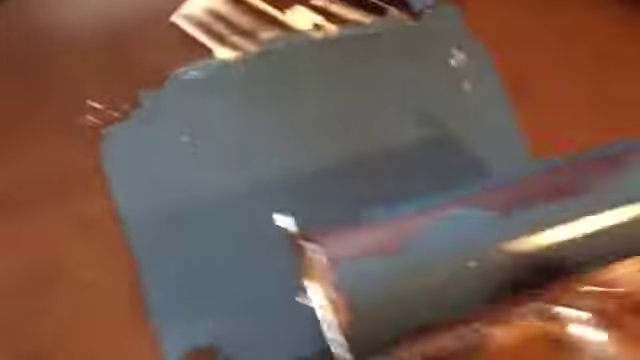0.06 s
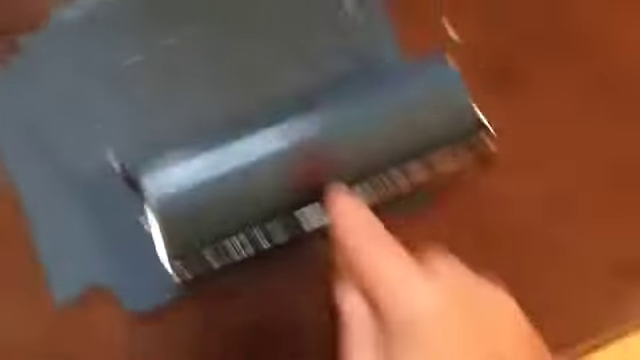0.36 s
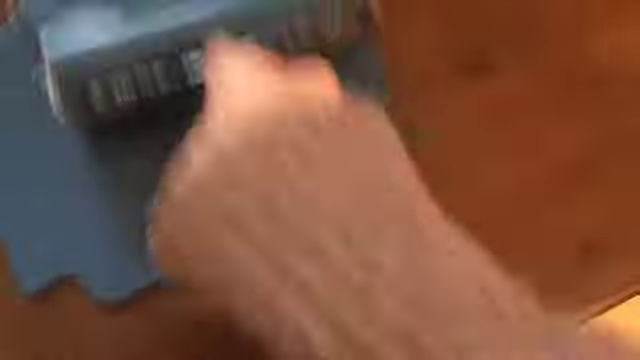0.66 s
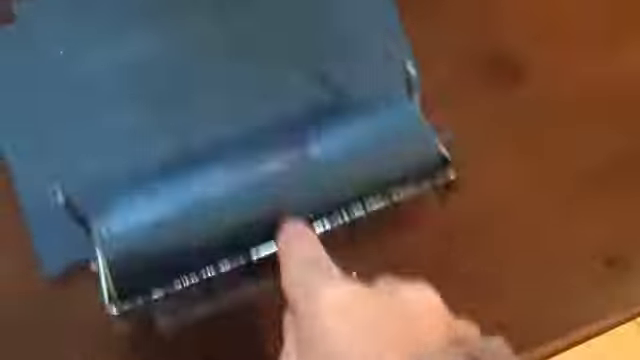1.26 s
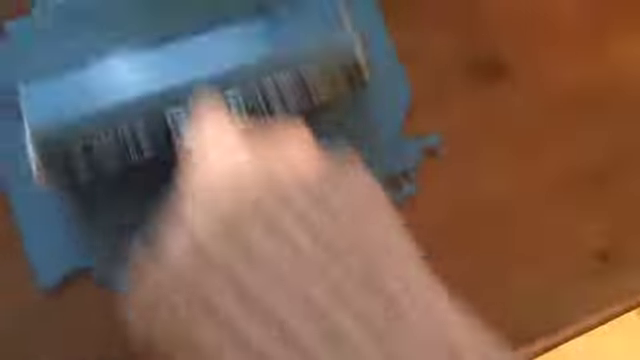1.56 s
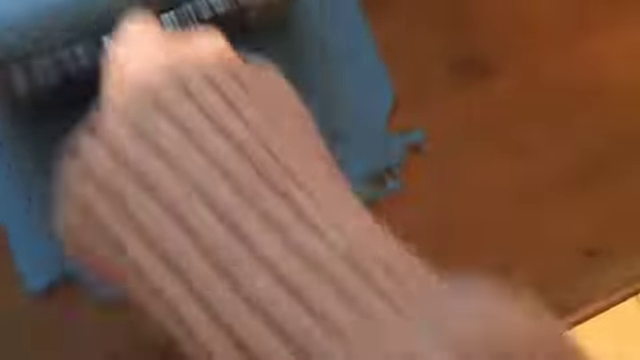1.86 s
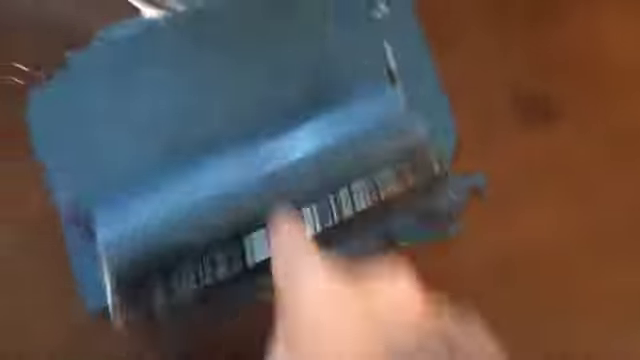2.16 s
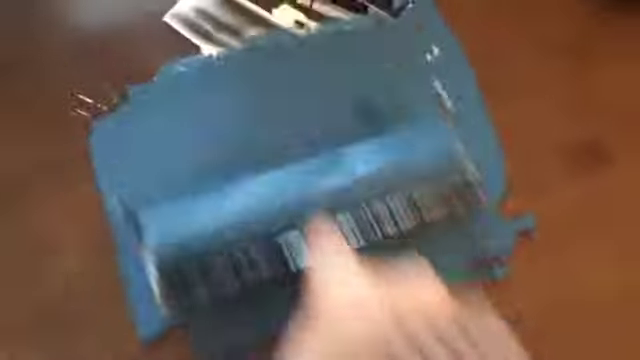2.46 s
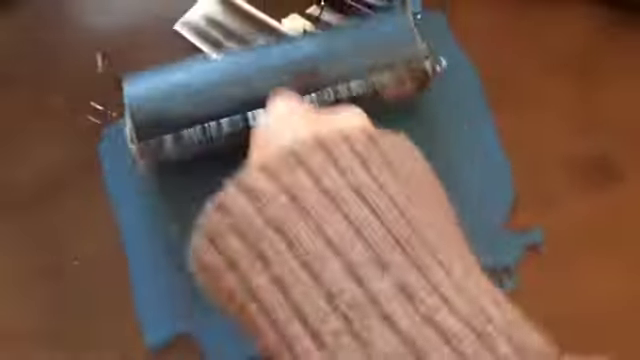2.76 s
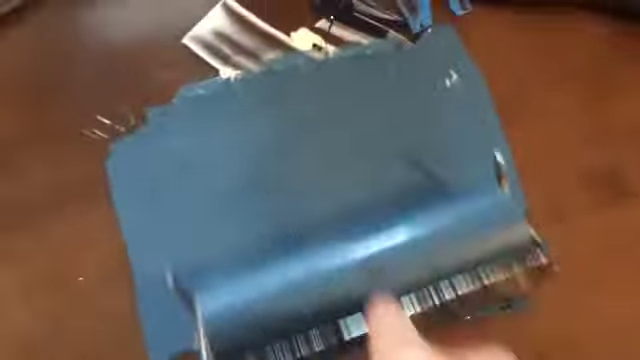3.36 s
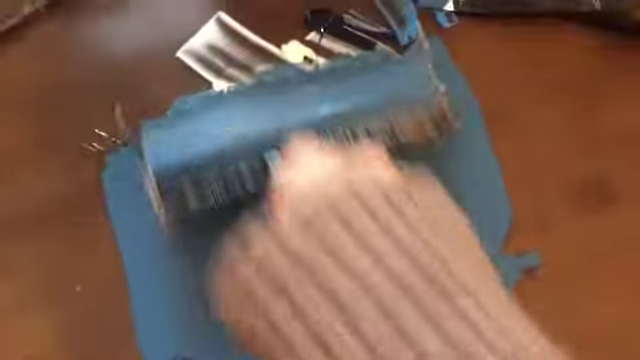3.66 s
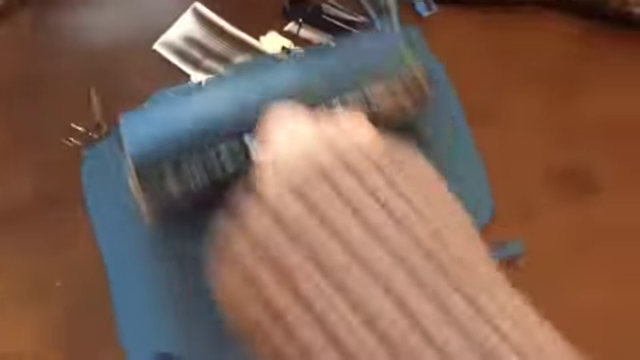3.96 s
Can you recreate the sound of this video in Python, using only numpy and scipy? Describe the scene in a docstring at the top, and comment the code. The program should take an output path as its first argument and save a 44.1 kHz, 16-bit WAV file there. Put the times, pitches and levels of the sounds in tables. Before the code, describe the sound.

A roller knocks onto a wooden table, then makes quick, sticky, hissing strokes through wet paint.

```python
"""A small room, a mono microphone close to a wooden table. A hand roller is set down with a knock,
creeps into a patch of tacky paint and is then rolled back and forth. The paint film splits behind
the roller in countless tiny snaps, a bright hiss that follows the speed and swells where the paint
is thickest. Underneath, the table rumbles and the roller's frame rings faintly."""
import sys
import numpy as np
from scipy import signal
from scipy.fft import rfft, irfft
from scipy.io import wavfile

SR = 44100
rng = np.random.default_rng(int(sys.argv[2]) if len(sys.argv) > 2 else 0)


def output_pcm(signal):
    """Save a mono or channel-first signal as 16-bit PCM at the path in sys.argv[1].

    Samples are clipped to [-1, 1] before scaling.
    """
    pcm = np.clip(np.atleast_2d(signal).T, -1, 1) * 32767
    wavfile.write(sys.argv[1], SR, np.round(pcm).astype(np.int16))


N = 176400
T = np.arange(N) / SR
BIN_HZ = np.arange(N // 2 + 1) * SR / N


def from_db(db):
    """Decibels to gain."""
    return 10 ** (np.asarray(db) / 20)


def unit_rms(x):
    """Scale to rms 1."""
    return x / np.sqrt(np.mean(x ** 2) + 1e-20)


def at_hz(points, hz):
    """Read a table on a log-frequency axis."""
    f, value = np.transpose(points)
    return np.interp(np.log(np.maximum(hz, 1)), np.log(f), value)


def coloured(x, spectrum):
    """Give a signal a spectrum; rms 1."""
    return unit_rms(irfft(rfft(x) * from_db(at_hz(spectrum, BIN_HZ)), N))


def drift(rate_hz):
    """Random wander, mostly slower than rate_hz; rms 1."""
    hop, settle = 20, 2000
    r = np.exp(-2 * np.pi * rate_hz * hop / SR)
    slow = signal.lfilter([1], [1, -2 * r, r * r], rng.standard_normal(N // hop + settle + 2))[settle:]
    return np.interp(np.arange(N) / hop, np.arange(len(slow)), unit_rms(slow))


def resonant_noise(hz, width_hz):
    """Random jolts through one resonance; rms 1."""
    r = np.exp(-np.pi * width_hz / SR)
    feedback = [1, -2 * r * np.cos(2 * np.pi * hz / SR), r * r]
    return unit_rms(signal.lfilter([1, 0, -1], feedback, rng.standard_normal(N)))


def decay(start, t60):
    """Envelope that jumps to 1 and falls 60 dB in t60 seconds."""
    return (T >= start) * from_db(-60 * np.clip((T - start) / t60, 0, 10))


def swell(centre, width_s):
    """Bell-shaped envelope."""
    return np.exp(-.5 * np.minimum(((T - centre) / width_s) ** 2, 100))


def struck(start, modes):
    """Modes set ringing by one blow."""
    t = np.clip(T - start, 0, 1)
    return sum(from_db(db) * decay(start, t60) * np.sin(2 * np.pi * hz * t) for hz, db, t60 in modes)


def room_tone(level_db=-69.5):
    """Quiet, steady background noise, strongest in the bass."""
    # Each row: frequency in Hz, relative noise density in dB.
    spectrum = [(25, -50), (40, 5), (58, 11.5), (85, -6.5), (170, -3), (400, -18.5), (800, -21.5),
                (2000, -22), (6000, -28.5), (15000, -35)]
    return from_db(level_db) * coloured(rng.standard_normal(N), spectrum)


def reflections(x, delay_s=0.00408):
    """The small room answers with a diffuse tail that dies sooner in the treble."""
    # Each row: frequency in Hz, reverberation time in seconds.
    room_t60 = [(150, 0.79), (800, 0.52), (3000, 0.33), (8000, 0.34), (15000, 0.33)]
    edges, tail = np.geomspace(60, 18000, 10), 0
    for low, high in zip(edges, edges[1:]):
        bandpass = signal.butter(2, [low, high], "band", fs=SR, output="sos")
        band = signal.sosfilt(bandpass, rng.standard_normal(SR))
        tail += band * decay(delay_s, at_hz(room_t60, np.sqrt(low * high)))[:SR]
    return signal.fftconvolve(x, tail / np.sqrt(np.sum(tail ** 2)))[:N]


def roller_motion(brake_s=0.083, speed_power=2.41):
    """Strokes speed up, cross thick paint and brake; gives velocity (pull positive) and peel strength."""
    # Pulls and pushes in turn. Each row: start, length and time to reach speed in seconds, level in dB,
    # time to the thick paint in seconds, its extra hiss in dB.
    strokes = [(0.685, 0.225, 0.053, -40.6, 0.063, 6.7), (0.89, 0.236, 0.102, -36.6, 0.169, 4.5),
               (1.125, 0.201, 0.045, -37.7, 0.056, 4.5), (1.305, 0.235, 0.105, -35.7, 0.162, 3.0),
               (1.547, 0.209, 0.055, -37.1, 0.07, 4.2), (1.733, 0.244, 0.099, -36.2, 0.158, 3.0),
               (1.968, 0.22, 0.074, -36.9, 0.077, 3.5), (2.167, 0.229, 0.07, -36.2, 0.14, 3.1),
               (2.403, 0.219, 0.056, -37.6, 0.074, 3.8), (2.592, 0.226, 0.055, -36.7, 0.136, 3.7),
               (2.821, 0.218, 0.064, -37.2, 0.078, 4.2), (3.02, 0.232, 0.072, -36.5, 0.142, 3.5),
               (3.263, 0.212, 0.055, -37.2, 0.071, 4.8), (3.451, 0.222, 0.064, -36.4, 0.139, 2.5),
               (3.678, 0.219, 0.088, -36.5, 0.075, 4.5), (3.864, 0.21, 0.075, -38.2, 0.145, 4.5)]
    velocity, peel = 0, 0
    for k, (start, length, rise, db, to_thick, thick_db) in enumerate(strokes):
        speeding_up = np.sin(np.pi / 2 * np.clip((T - start) / rise, 0, 1))
        braking = np.sin(np.pi / 2 * np.clip((start + length - T) / brake_s, 0, 1))
        speed = speeding_up * braking
        velocity += speed * (-1) ** k
        peel += speed ** speed_power * from_db(db + thick_db * swell(start + to_thick, width_s=0.021))
    return velocity, peel


def table_rumble(speed, level_db=-59.5, fade_db_per_s=-1, speed_power=2.47, rattle_db=-8.5):
    """Rolling shakes table and frame, less as the paint evens out; ridges add soft, low bumps."""
    # Table and frame. Each row: resonance in Hz, width in Hz, relative level in dB.
    resonances = [(113.4, 27, -7), (173, 36.5, -2), (205.6, 49, -5), (340, 42, -11), (627, 26, -17.5),
                  (783, 39, -5.5), (837, 36, -9.5), (859, 21, -18.5), (1410, 72, -16), (2223, 50, -13.5)]
    # Ridges in the paint. Each row: time in seconds, level in dB, pitch in Hz.
    ridges = [(0.563, -57, 200), (.705, -56, 203), (0.776, -51, 165), (1.029, -49, 169),
              (1.212, -51.5, 176), (1.26, -58, 200), (1.441, -50, 178), (1.503, -51.5, 205),
              (1.64, -47, 185), (1.875, -54, 189), (2.081, -63, 175), (2.295, -55, 175), (2.51, -59, 180),
              (2.939, -55, 186), (3.368, -54, 190), (3.568, -51.5, 191), (3.787, -54.5, 185),
              (3.98, -64, 190)]
    shaking = unit_rms(sum(from_db(db) * resonant_noise(hz, width) for hz, width, db in resonances))
    waver_hz = 11.66 * drift(38.9)
    waver_cycles = np.cumsum(waver_hz) / SR
    out = from_db(level_db + fade_db_per_s * (T - T.mean())) * speed ** speed_power * shaking
    for time, db, hz in ridges:
        tone = np.sqrt(2) * np.sin(2 * np.pi * (hz * (T - time) + waver_cycles))
        out += from_db(db) * swell(time, width_s=0.0086) * (tone + from_db(rattle_db) * shaking)
    return out


def landing_knock(thud_hz=110, thud_t60_s=.05, crack_db=-2):
    """The roller lands one end first and chatters: a thud, ringing wood and a clack of the frame."""
    # Each row: contact time in seconds, then levels of thud, wood and frame in dB.
    landings = [(.2939, -32.5, -50, -37.5), (.3413, -43, -20, -20), (0.3448, -40, -35.5, -34.5),
                (0.348, -42, -35.5, -41), (0.3523, -50, -29, -36)]
    # Table top and metal frame. Each row: mode in Hz, relative level in dB, t60 in seconds.
    wood_modes = [(88, -34, 0.34), (169.5, -19, 0.09), (226.6, -6.5, 0.14), (323, -7, 0.059),
                  (586, -20.5, 0.069), (785, -5, 0.053), (910, -14.5, 0.031), (990, -18.5, 0.016),
                  (1380, -21, 0.022), (1680, -25.5, .015)]
    frame_modes = [(1450, -8, .014), (1717, -7, .016), (1995, -8, .025), (2230, -15, .018),
                   (2440, -13, .02), (3130, -19, .035), (3700, -17, .022), (4400, -15, .012),
                   (5280, -15, .016), (6050, -12, .018), (7400, -17, .006), (9550, -13, .02),
                   (12100, -27, .018), (14800, -28, .018)]
    # Contact noise. Each row: frequency in Hz, relative density in dB.
    crack_spectrum = [(300, 7), (550, -1.5), (1000, 8.5), (1800, 0), (2400, 7), (2900, -8), (4000, -1),
                      (6000, 4), (7300, -10.5), (9600, 1), (11000, -25), (15000, -23)]
    crack = from_db(crack_db) * coloured(rng.standard_normal(N), crack_spectrum)
    out = 0
    for start, thud_db, wood_db, frame_db in landings:
        thud = struck(start, [(thud_hz, thud_db, thud_t60_s)])
        clack = struck(start, frame_modes) + crack * decay(start, t60=0.022)
        out += thud + from_db(wood_db) * struck(start, wood_modes) + from_db(frame_db) * clack
    return out


def snaps(per_s, spread_db=2):
    """Paint splits in tiny snaps of uneven size, at random moments; rms 1."""
    # Each row: frequency in Hz, relative density in dB.
    spectrum = [(300, -46.5), (1100, -21), (1800, -22), (2400, -16), (3300, -11), (4500, -8), (6400, -3.5),
                (7500, -5), (9600, -0.5), (10400, -4), (11200, 0), (15000, -0.5)]
    sizes = from_db(spread_db * np.minimum(rng.exponential(1, N), 4)) * rng.choice([-1, 1], N)
    snapping = rng.random(N) < per_s / SR
    return coloured(sizes * snapping / np.sqrt(per_s), spectrum)


def shifting_colour(hiss, velocity, wander_db=2.1, wander_hz=14):
    """The hiss changes colour at random, with the direction of travel and as the paint spreads; rms 1."""
    # Each row: frequency in Hz, dB added on a pull and taken away on a push.
    pull_colour = [(1000, 1.3), (2200, 0), (4000, 0.06), (8000, -0.45), (14000, 0)]
    # The hiss thins as the paint spreads. Each row: frequency in Hz, change in dB per second.
    thinning = [(1000, -0.5), (2200, -0.5), (4500, -.5), (8000, -0.03), (14000, 0)]
    centres = np.linspace(np.sqrt(900), np.sqrt(15000), 24) ** 2
    spectrum, out = rfft(hiss), 0
    for centre, share in zip(centres, np.eye(len(centres))):
        band = irfft(spectrum * np.interp(BIN_HZ, centres, share), N)
        colour_db = at_hz(pull_colour, centre) * velocity + at_hz(thinning, centre) * (T - T.mean())
        out += band * from_db(wander_db * drift(wander_hz) + colour_db)
    return unit_rms(out)


def tacky_paint(velocity, peel, snaps_per_s=16000, hiss_db=0.91, creep_db=-36,
                flicker_db=0.81, flicker_hz=45):
    """Snaps crowd into a hiss as the roller speeds up; the slow first roll crackles, and strings pop."""
    # The slow first roll. Each row: time in seconds, level in dB relative to creep_db.
    creep_curve = [(.345, -27), (.40, -21.5), (.47, -18), (.53, -16), (.55, -14.5), (.61, -14.5),
                   (.645, -19.5), (.66, -50)]
    # Strings of paint that snap singly. Each row: start in seconds, level in dB.
    strings = [(0.463, -48), (0.544, -34.5), (0.559, -39.5), (0.614, -40), (0.643, -44), (0.698, -45),
               (0.835, -32.5), (.917, -39), (1.148, -49), (1.271, -33), (1.331, -41), (2.616, -55),
               (2.85, -49), (3.062, -37), (3.294, -44), (3.708, -38.5)]
    hiss = shifting_colour(snaps(snaps_per_s * np.maximum(np.abs(velocity), .15)), velocity)
    hiss *= peel * from_db(hiss_db + flicker_db * drift(flicker_hz))
    times, levels_db = np.transpose(creep_curve)
    creep = snaps(per_s=7000) * (T > times[0]) * (T < times[-1])
    creep *= from_db(creep_db + np.interp(T, times, levels_db) + flicker_db * drift(flicker_hz))
    pops = snaps(snaps_per_s) * sum(from_db(db) * decay(start, t60=0.027) for start, db in strings)
    return hiss + creep + pops


def scene(knock_room_db=-12.5, roll_room_db=-13.5):
    """Knock and strokes up close, the room faint behind them, alike in both channels."""
    velocity, peel = roller_motion()
    knock = landing_knock()
    rolling = tacky_paint(velocity, peel) + table_rumble(np.abs(velocity))
    room = reflections(from_db(knock_room_db) * knock + from_db(roll_room_db) * rolling)
    mono = knock + rolling + room + room_tone()
    return np.array([mono, mono])


def record(dry, low_cut_hz=52, high_cut_hz=15300):
    """The microphone loses the deep bass; the top is cut steeply."""
    low_cut = signal.butter(4, low_cut_hz, "high", fs=SR, output="sos")
    high_cut = signal.ellip(12, .1, 70, high_cut_hz, fs=SR, output="sos")
    return signal.sosfilt(high_cut, signal.sosfilt(low_cut, dry))


dry = scene()
out = record(dry)
output_pcm(out)
```